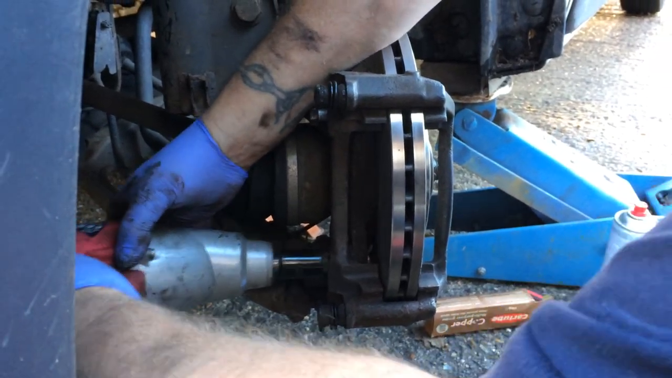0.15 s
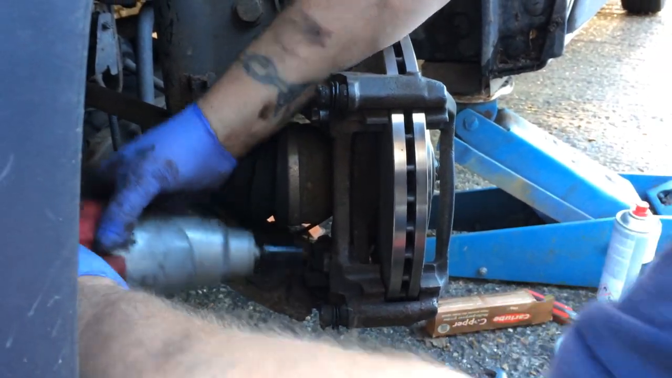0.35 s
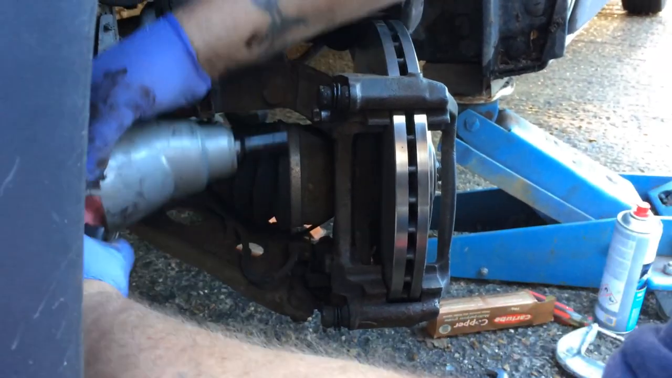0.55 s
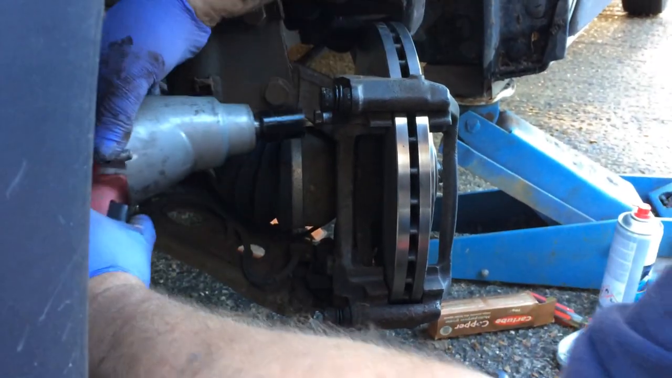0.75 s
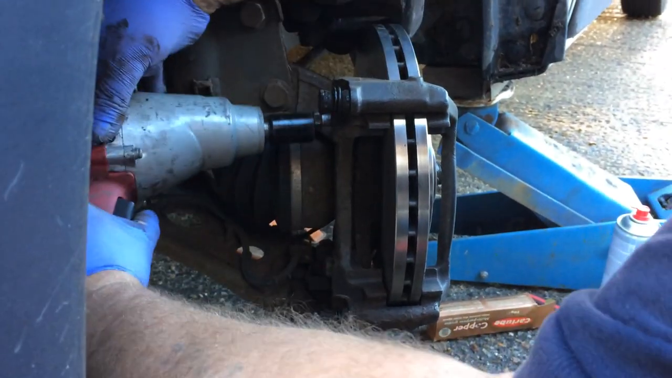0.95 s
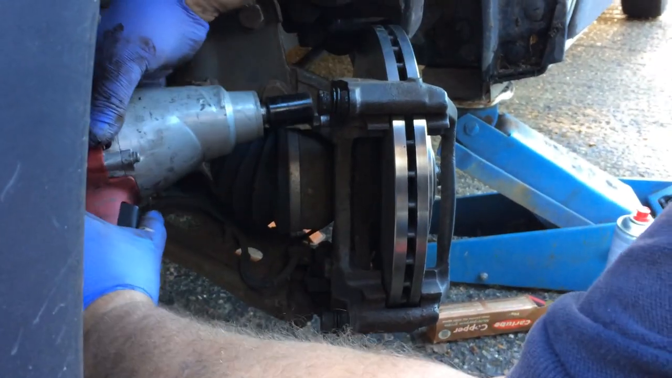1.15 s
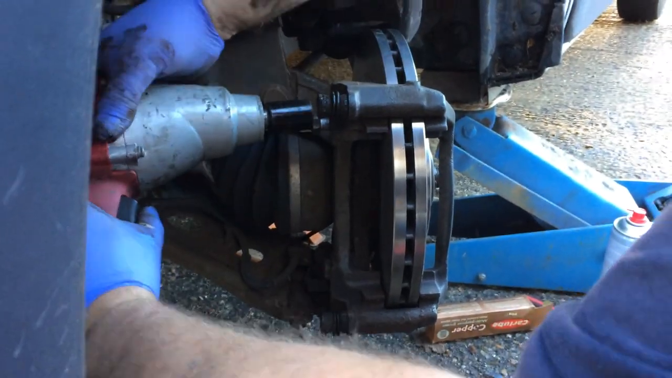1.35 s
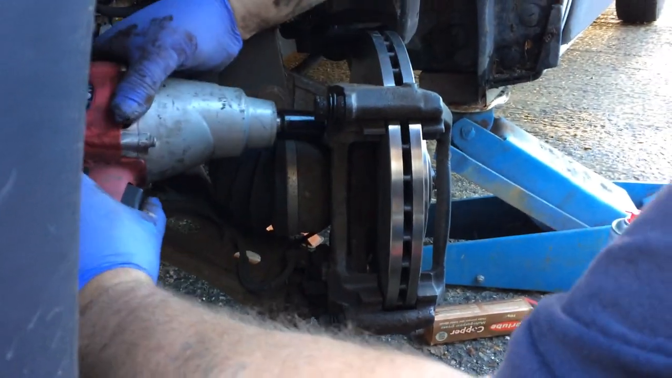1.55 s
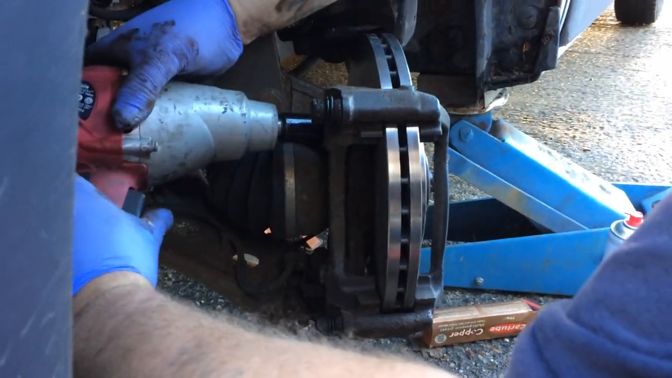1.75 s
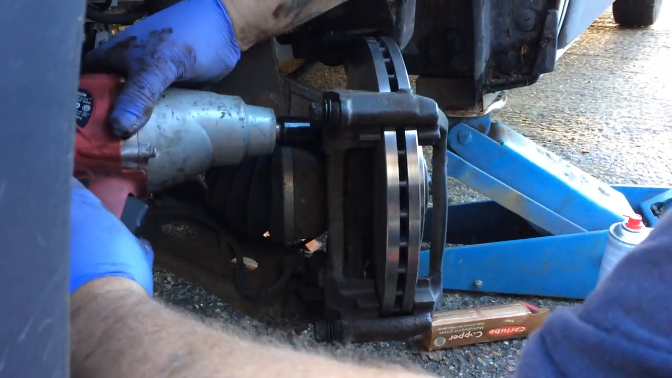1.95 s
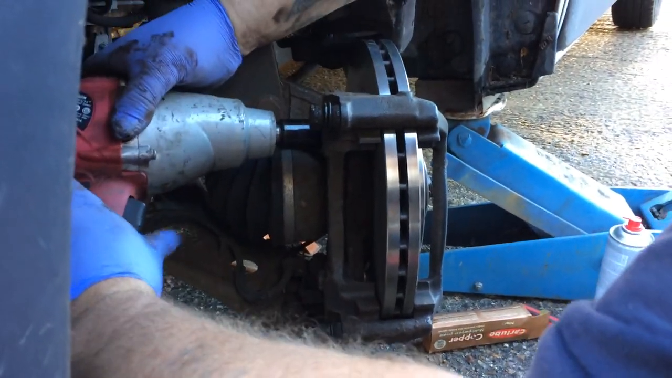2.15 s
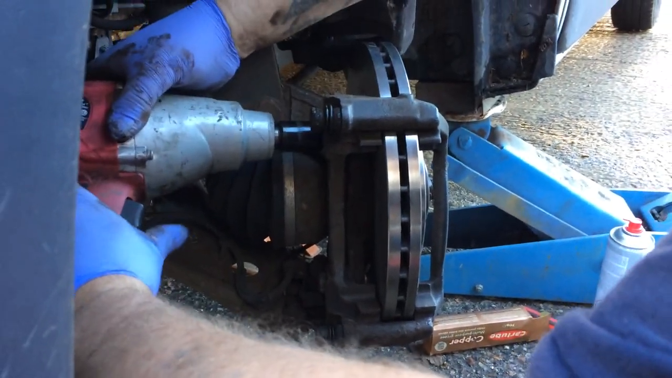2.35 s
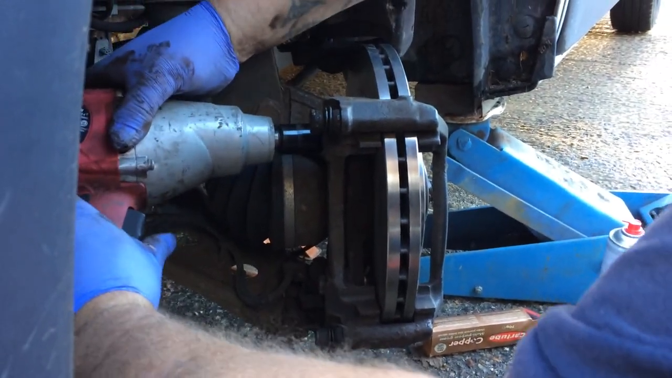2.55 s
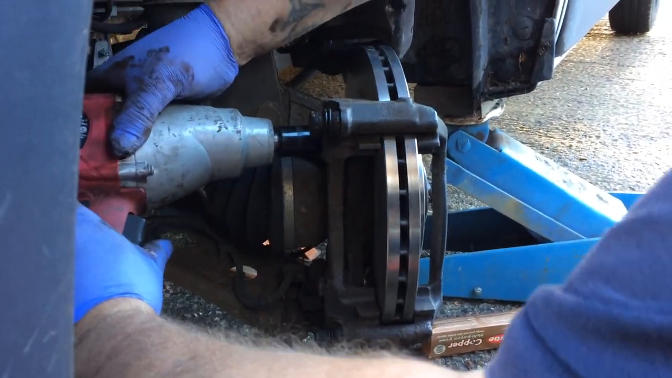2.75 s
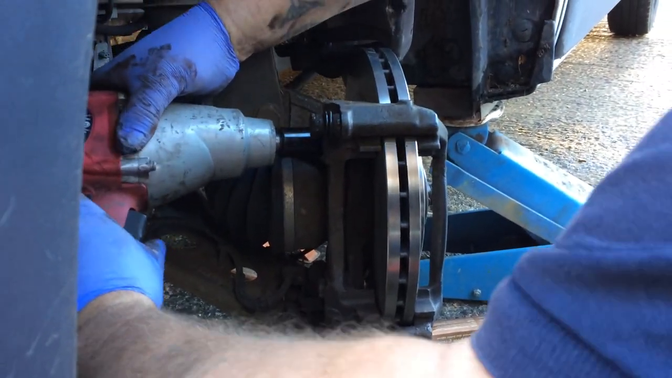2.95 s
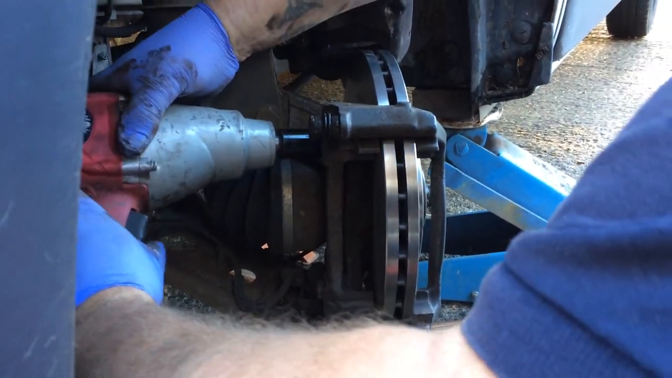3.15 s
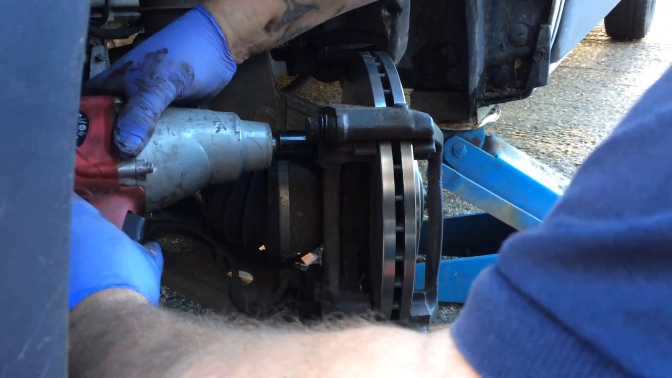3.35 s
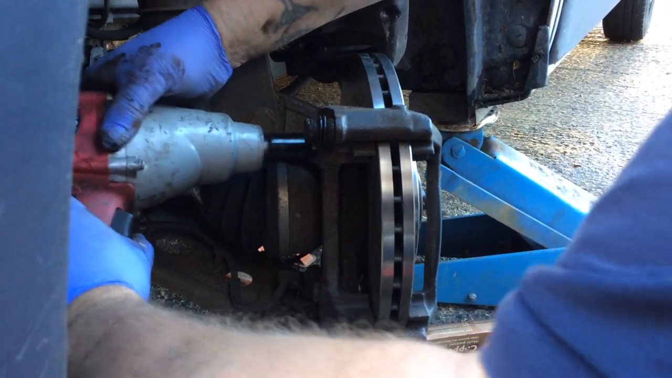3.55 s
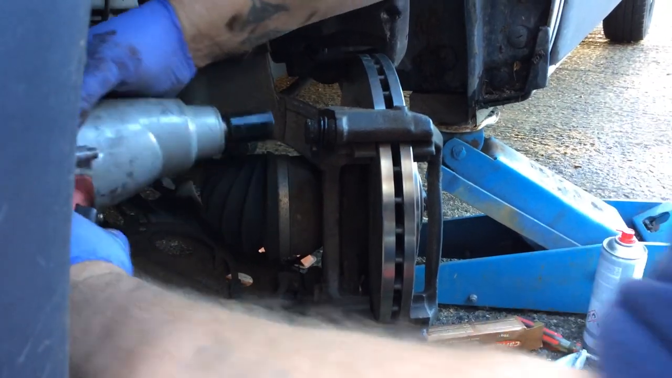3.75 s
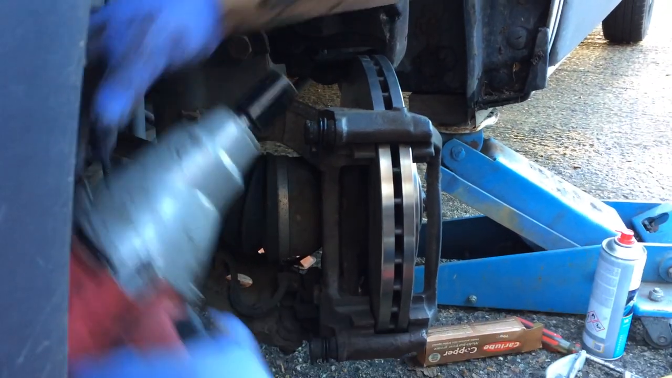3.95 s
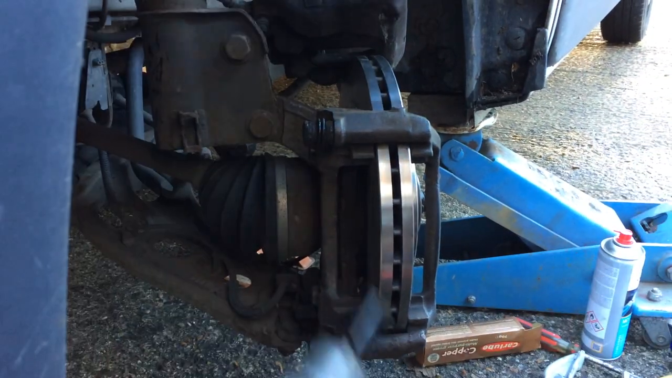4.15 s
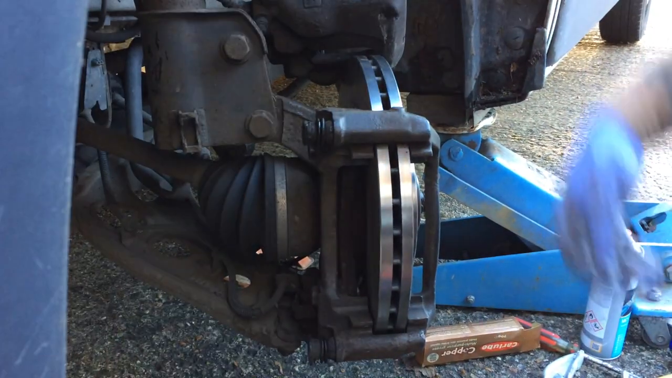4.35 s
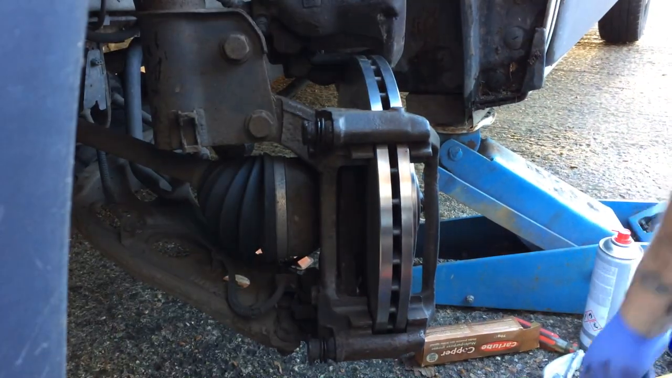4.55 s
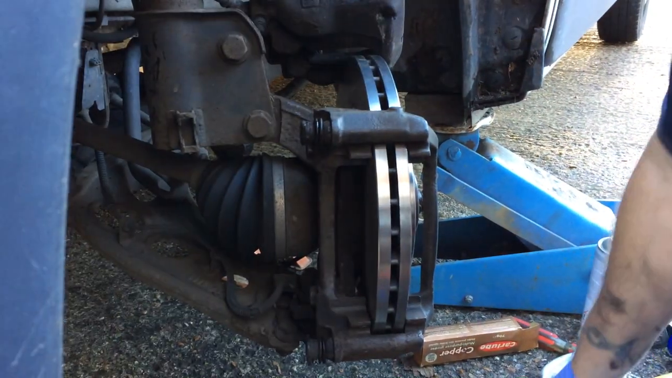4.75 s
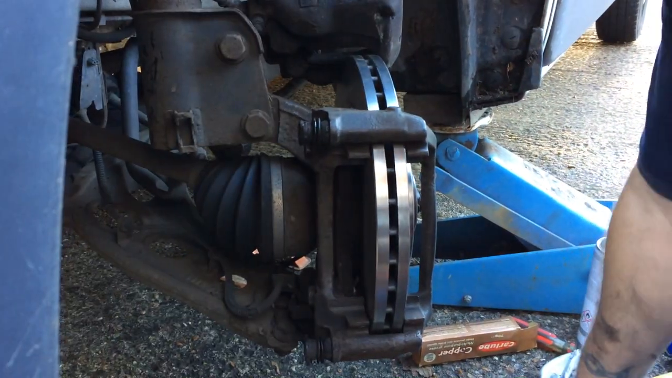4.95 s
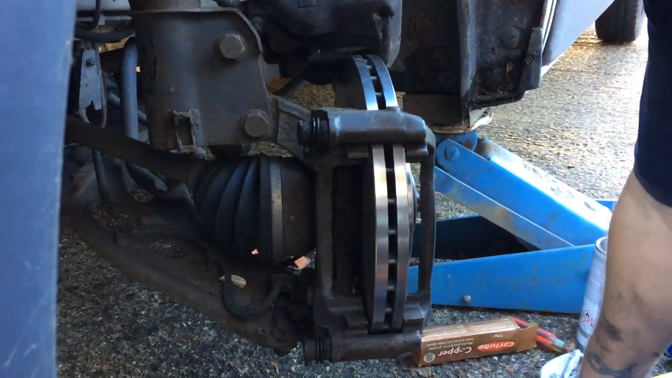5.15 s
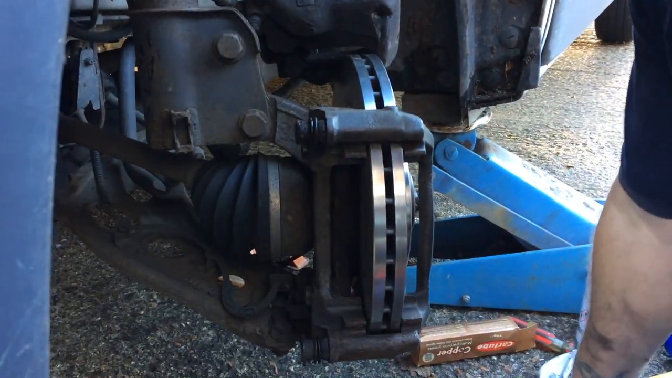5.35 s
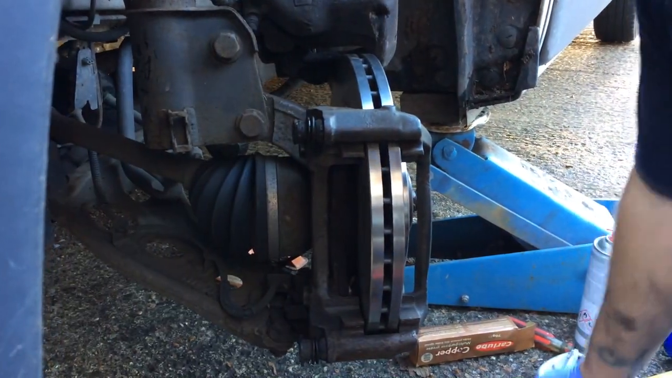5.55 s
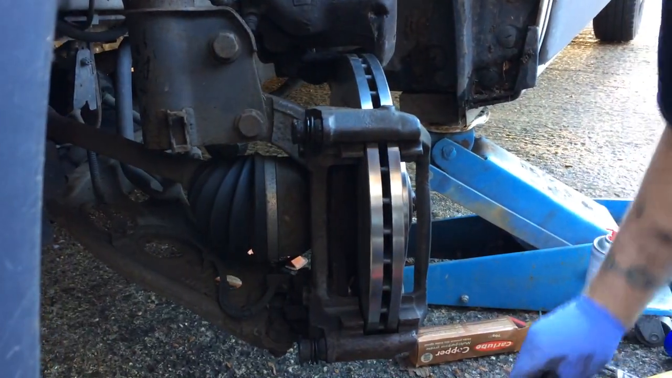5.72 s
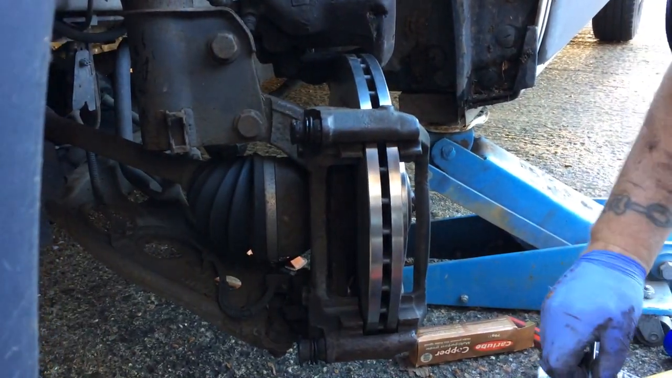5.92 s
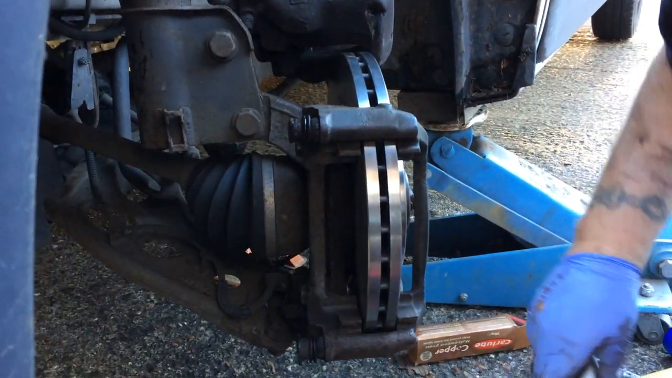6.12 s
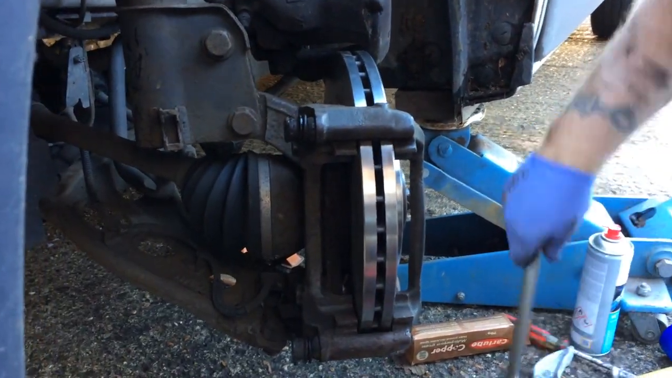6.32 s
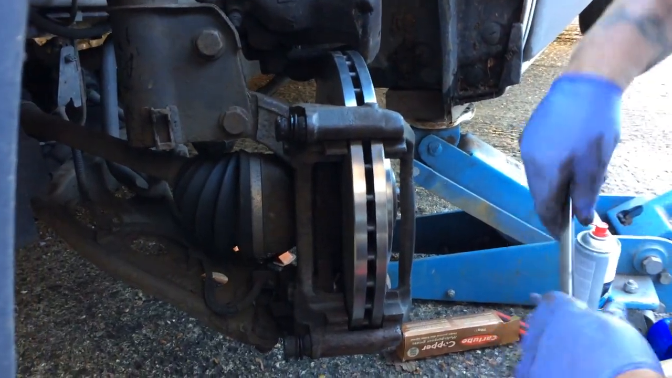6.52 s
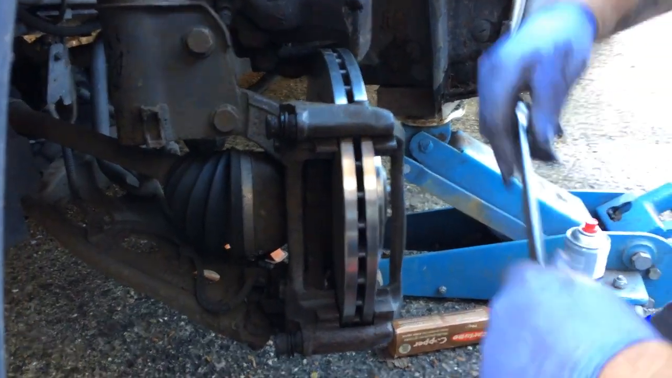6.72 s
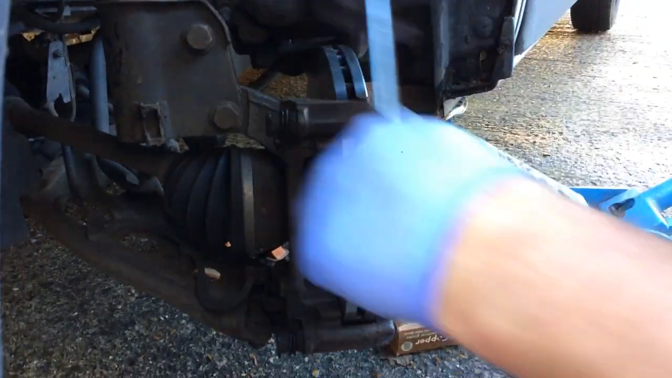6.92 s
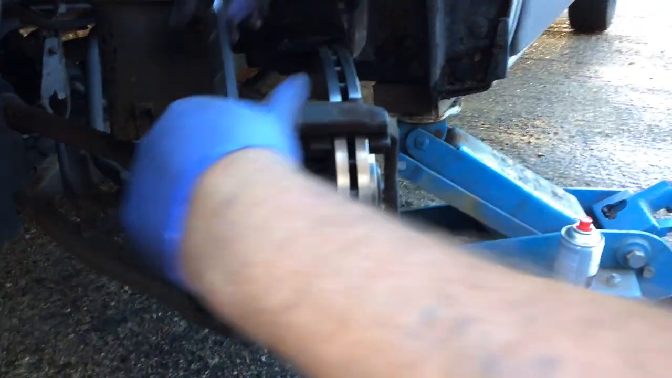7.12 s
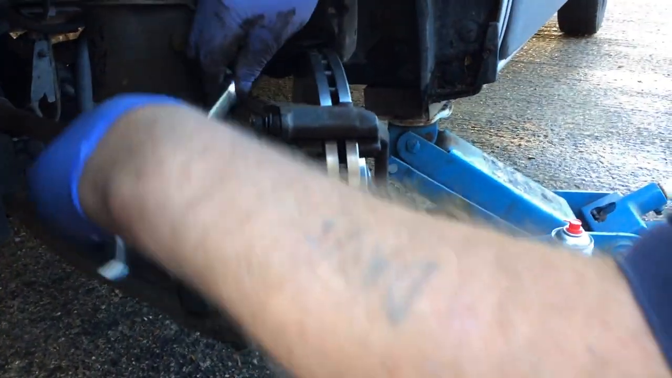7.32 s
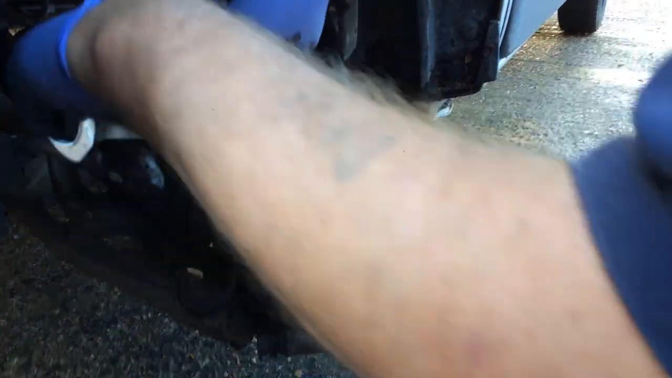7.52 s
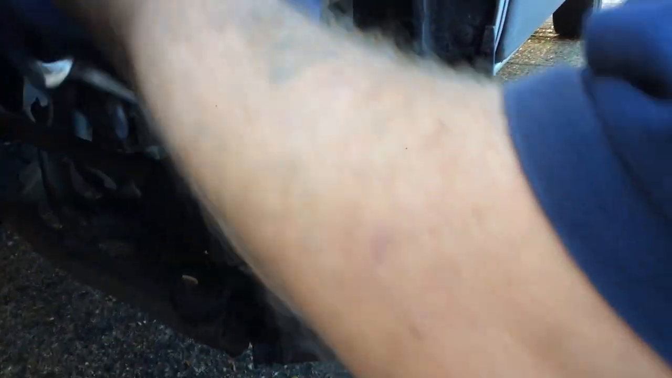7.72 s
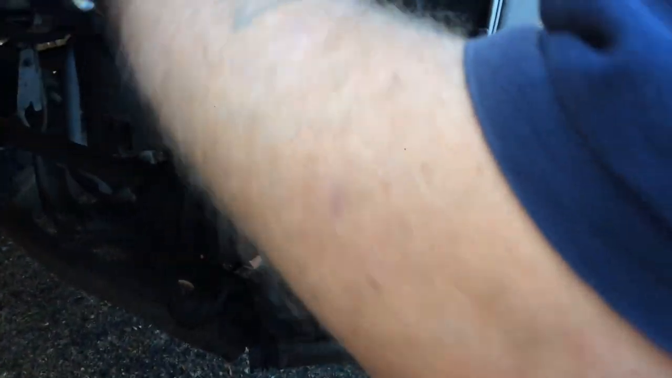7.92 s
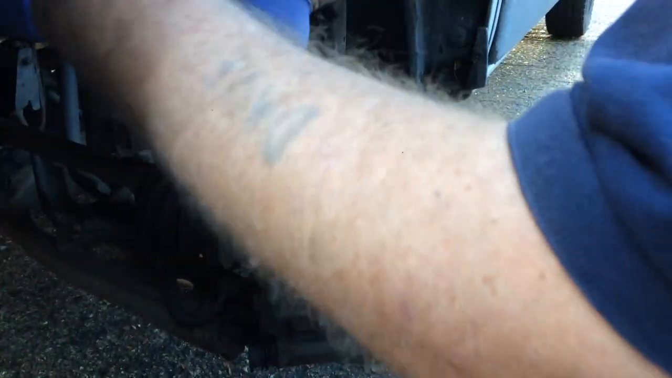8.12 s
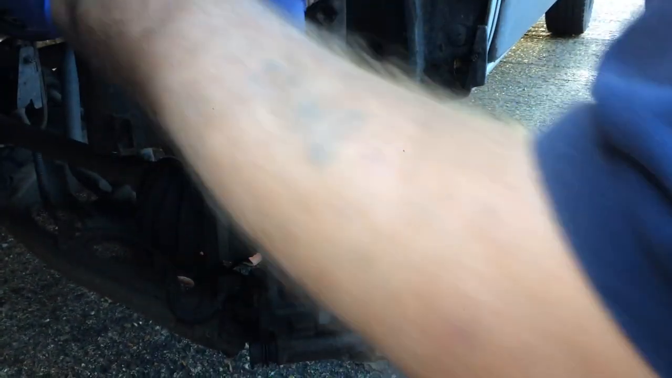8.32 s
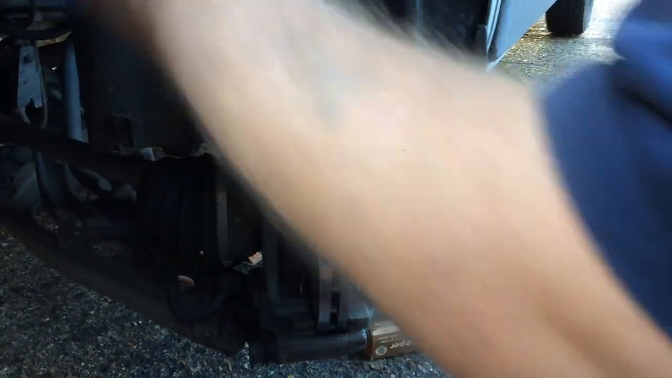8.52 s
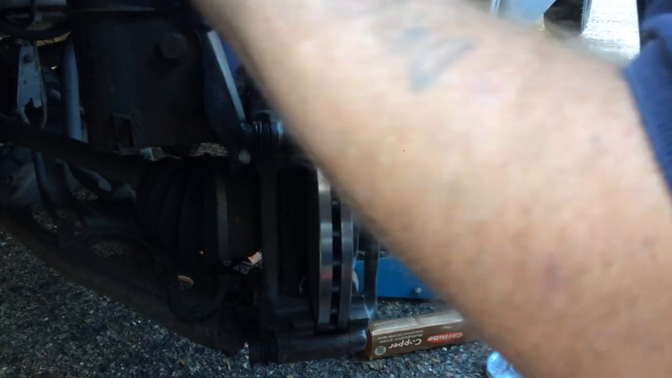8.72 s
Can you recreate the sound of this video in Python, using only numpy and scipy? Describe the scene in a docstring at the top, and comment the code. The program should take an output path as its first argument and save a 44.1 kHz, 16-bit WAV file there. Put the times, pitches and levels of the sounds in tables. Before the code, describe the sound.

A close, dry outdoor perspective beside a car's wheel arch, with a quiet street behind and faint tones dying away at the start. From 0.5 to 1.7 s a heavy wrench shifts with low rumbles, padded thuds and harder steel clacks. A sharp knock at 2.0 s begins the trigger pull: a whine races upward with loose rattling, bites at 2.4 s, and becomes loud, rough hammering at roughly forty blows a second until 3.15 s. A tiny blip at 3.2 s follows, then a soft rising whirr and light knocks. At 4.4 to 5.1 s the tool clunks down on concrete. Around 5.3 to 5.6 s a spanner scrapes and clinks brightly. Faint sleeve rustle follows near 6.2 and 6.8 s, then damped ticks and a scrape at 7.6 to 7.9 s and one knock at 8.6 s. Traffic swells from 4.7 s; a low engine hum peaks near 7.7 s.

```python
"""Faint fading tones and a quiet street open the scene; a heavy wrench shifts and knocks against a suspension.
The impact wrench spins a brake caliper bolt down with a whining rattle and hammers it tight: gliding partials,
dense random contacts and band-split noise crashes. It is laid down, and a steel spanner (beating modes) is
picked off the concrete and fitted to the bolt. Sleeves rustle as grainy noise; outside the open driveway
traffic noise swells and the hum of a distant engine joins in."""
import sys
import numpy as np
from scipy import signal
from scipy.fft import rfft, irfft, next_fast_len
from scipy.io import wavfile

SR = 44100
rng = np.random.default_rng(int(sys.argv[2]) if len(sys.argv) > 2 else 0)


def unload_wav(signal):
    """Save mono or channel-first audio to the path in sys.argv[1] as 16-bit WAV at rate SR, clipped to [-1, 1]."""
    wavfile.write(
        sys.argv[1],
        SR,
        np.round(np.clip(np.atleast_2d(signal).T, -1, 1) * 32767).astype(np.int16),
    )


N = 387198
TIME = np.arange(N) / SR
CUTOFF_HZ = 16000
LOADED_S, BITE_S, SEATED_S = 2.402, 0.03, 2.88   # the bolt takes load, within this time; its head seats
RELEASE_T60 = .13   # s, after the trigger is let go

# trigger pulls of the wrench: on_s, off_s, rattle level_db before load and trim
TRIGGER_PULLS = [(2.023, 3.141, -20.5), (3.193, 3.202, -16)]
# knocks of the tools against suspension and bolt: start_s, clack level_db before each layer's trim,
# hardness (about -1 padded, 1 bare steel)
TOOL_KNOCKS = [(0.543, -34.5, -1.06), (0.611, -23.5, -0.82), (0.654, -40.5, -1.19), (0.697, -38.5, -0.79),
               (0.913, -25.5, 0.4), (1.084, -25.5, 0.59), (1.428, -35.5, 0.16), (1.455, -33.5, 0.72),
               (1.488, -29, 0.41), (1.593, -42, -0.82), (1.666, -17.5, 0.45), (2.022, -31.5, 1),
               (2.045, -13.5, 0.78), (3.353, -27.5, 0.14), (3.532, -31.5, 0.69), (7.584, -35.5, -0.43),
               (7.821, -29.5, 0.62), (8.566, -26, 0.39)]
# colour of low rumble: pitch_hz, level_db
LOW_RUMBLE = [(25, -20), (60, 4.5), (120, 2), (260, -5), (400, -16), (900, -45)]


def from_db(db):
    """Decibels to amplitude."""
    return np.exp(np.asarray(db) * (np.log(10) / 20))


def rms_one(x):
    """Level a signal to rms one."""
    return x / np.sqrt(np.mean(x ** 2) + 1e-20)


def drift(rate):
    """Slow chance of rms one, with this many random points a second."""
    knots = rng.standard_normal(N // 32)
    return rms_one(np.interp(TIME * rate, np.arange(len(knots)), knots))


def noise(colour):
    """Steady noise of a given colour, rms one; it falls away below the first point."""
    hz, db = np.transpose(colour)
    size = next_fast_len(N)
    bins = np.maximum(np.arange(size // 2 + 1) * SR / size, 1)
    gain = from_db(np.interp(np.log(bins), np.log(hz), db)) * np.minimum(bins / hz[0], 1) ** 2
    return rms_one(irfft(rfft(rng.standard_normal(size)) * gain, size)[:N])


def filtered(x, edge_hz, kind, order=2):
    """Butterworth filter."""
    sos = signal.butter(order, np.minimum(edge_hz, SR / 2 - 100), kind, fs=SR, output="sos")
    return signal.sosfilt(sos, x)


def clicks(times, heights):
    """One sample per contact."""
    out = np.zeros(N)
    out[np.round(np.asarray(times) * SR).astype(int)] = heights
    return out + 1e-18


def dying(power, t60):
    """Amplitude envelope of energy that is put in and then leaks away."""
    return np.sqrt(signal.lfilter([1], [1, -from_db(-120 / (t60 * SR))], power))


def settled(t60):
    """Where the dying envelope settles when unit power keeps coming in."""
    return dying(np.ones(SR), t60)[-1]


def ring(x, hz, t60):
    """A unit click sets a sine of height one ringing."""
    r, w = from_db(-60 / (t60 * SR)), 2 * np.pi * hz / SR
    return signal.lfilter([0, np.sin(w)], [1, -2 * r * np.cos(w), r * r], x)


def crowded(x):
    """Heavy steel has countless close modes, which ripple the spectrum by a few dB every few tens of hertz."""
    size = next_fast_len(N)
    bins = np.arange(size // 2 + 1) * SR / size
    ripple_db = 1.7 * np.interp(bins / 45, np.arange(SR // 45), rng.standard_normal(SR // 45))
    # the ripple grows in towards 1500 Hz
    ripple = rms_one(from_db(ripple_db * np.clip(bins / 1500, 0, 1)))
    return irfft(rfft(x, size) * ripple, size)[:N]


def gate(on_s, off_s, attack_s, t60):
    """Attack, hold and release."""
    attack = np.clip((TIME - on_s) / attack_s, 0, 1)
    return attack * from_db(-60 * np.clip((TIME - off_s) / t60, 0, 2))


def strokes(rows):
    """Sliding contacts swell and fade smoothly about their middle; rows (middle_s, length_s, level_db)."""
    out = 0
    for s, length, db in rows:
        distance = np.minimum((2 * (TIME - s) / length) ** 2, 6)
        out = out + from_db(db) * np.exp(-np.square(distance))
    return out


def fading_tones():
    """A few faint tones die away at the start."""
    # start tones: pitch_hz, level_db, t60_s
    tones = [(286, -49.5, 4.5), (530, -58.5, 2.2)]
    out = 0
    for hz, db, t60 in tones:
        out = out + from_db(db - 60 * TIME / t60 + drift(15)) * np.sin(2 * np.pi * hz * TIME)
    return out


def outdoors(engine_hz=63.7, engine_waver=0.0091):
    """Far traffic noise that slowly swells, low rumble and the wavering sine hum of one engine."""
    # colour of the street: pitch_hz, level_db
    street_colour = [(150, 9), (480, -1), (1000, 2.5), (1500, 0), (2600, -12.5), (5000, -22),
                     (15000, -35.5)]
    # course of the distant engine's hum: time_s, level_db
    engine_course = [(6.1, -70), (6.19, -47.5), (7.46, -36.5), (7.7, -31.5), (8.38, -41), (8.78, -40)]
    street_db, rumble_db = -54, -53.5
    approach_s, approach_db_per_s = 4.72, 2   # traffic draws near
    engine_rumble_db = -7   # rumble that comes with the hum, relative to it

    s, db = np.transpose(engine_course)
    engine = from_db(np.interp(TIME, s, db)) * ((TIME > s[0]) & (TIME < s[-1]))
    hum = np.sin(2 * np.pi * np.cumsum(engine_hz * (1 + engine_waver * drift(9.2))) / SR)
    traffic_db = street_db + approach_db_per_s * np.maximum(TIME - approach_s, 0)
    traffic = from_db(traffic_db) * noise(street_colour)
    rumble_level = np.hypot(from_db(rumble_db), from_db(engine_rumble_db) * engine)
    rumble = rumble_level * from_db(2 * drift(7.4)) * noise(LOW_RUMBLE)
    return traffic + rumble + engine * from_db(drift(5.5)) * hum


def sliding(low_hz=1100, high_hz=4300):
    """Steel sliding on rough steel or concrete grates unevenly."""
    # tools sliding on bolt head and ground: middle_s, length_s, level_db
    slides = [(.08, 0.12, -51.5), (1.525, 0.039, -39), (3.58, 0.13, -52), (4.48, 0.28, -55),
              (5.597, 0.019, -35.5), (7.755, 0.033, -46), (7.848, 0.05, -35.5)]
    uneven = rng.standard_normal(N) * from_db(2 * drift(500))
    grit = rms_one(filtered(uneven, [low_hz, high_hz], "band"))
    return strokes(slides) * grit


def shifting(low_hz=80):
    """Moving the heavy wrench about makes the suspension rumble softly."""
    # the wrench shifting against the suspension: middle_s, length_s, level_db
    shifts = [(.42, 0.79, -48), (.85, 0.34, -44.5), (1.27, 0.26, -47.5), (1.64, 0.2, -45.5)]
    return strokes(shifts) * rms_one(filtered(noise(LOW_RUMBLE), low_hz, "high"))


def knocks(contact_t60=.0045, trim_db=-1):
    """A knock builds up over a few milliseconds and rings in noise registers; soft ones thud, hard ones tick."""
    # the wrench laid down on concrete: start_s, clack level_db before trim, hardness
    landings = [(4.384, -20, 0.56), (4.444, -29.5, 0.4), (4.737, -34, -0.43), (4.748, -27.5, 0.0044),
                (4.869, -30.5, 0.49), (5.076, -28, 0.85), (5.099, -20, -0.049)]
    # how each register dies: low_hz, high_hz, level_db, t60_s, gain_db per unit of hardness, concrete gain_db
    registers = [(785, 2030, -5.5, 0.072, -2.5, 2.5), (67.6, 313, -14, 0.18, -23, 1),
                 (339, 710, -23, 0.07, -21.5, 16), (2810, 6000, -11, 0.041, 6, -2),
                 (6610, 12000, -34, 0.034, 28.5, 2)]
    s, db, hardness = np.transpose([*TOOL_KNOCKS, *landings])
    on_concrete = np.arange(len(s)) >= len(TOOL_KNOCKS)
    out = 0
    for low_hz, high_hz, register_db, t60, hard_db, concrete_db in registers:
        force = from_db(db + register_db + hard_db * hardness + concrete_db * on_concrete)
        # the two parts stay in touch briefly and feed the ring meanwhile
        contact = dying(clicks(s, force ** 2), contact_t60) / settled(contact_t60)
        swell = dying(contact ** 2, t60)
        white = crowded(rng.standard_normal(N))
        band_level = np.std(filtered(white, [low_hz, high_hz], "band"))
        out = out + filtered(white * swell, [low_hz, high_hz], "band") / band_level
    return from_db(trim_db) * out


def thud(hard_db=-12):
    """Padded knocks push the heavy suspension, which answers in a few low modes."""
    # suspension modes: pitch_hz, level_db, t60_s
    low_modes = [(60, -15.5, .25), (150, -7.5, 0.12), (308, -12.5, 0.071)]
    s, db, hardness = np.transpose(TOOL_KNOCKS)
    push = clicks(s, from_db(db + hard_db * hardness))
    return sum(from_db(mode_db) * ring(push, hz, t60) for hz, mode_db, t60 in low_modes)


def socket(ring_db=-14, hard_db=8, t60=0.041):
    """Knocks ring the hollow socket, padded ones less, each with another mix of its modes."""
    # socket modes: pitch_hz, level_db before the ring level
    socket_modes = [(1380, -2.5), (1730, -1), (2230, -12), (2650, 2.5), (3460, -6.5), (4120, -2),
                    (4880, -2), (5950, -4.5)]
    s, db, hardness = np.transpose(TOOL_KNOCKS)
    force_db = db + ring_db + hard_db * np.minimum(hardness, 0)
    out = 0
    for hz, mode_db in socket_modes:
        mix_db = 3 * rng.standard_normal(len(s))
        out = out + ring(clicks(s, from_db(force_db + mode_db + mix_db)), hz, t60)
    return out


def disc(struck, knock_db=1):
    """The brake disc stores a little of each early knock and hammer blow and sings on faintly."""
    # long ring of the disc: pitch_hz, level_db, t60_s
    disc_modes = [(302, -50, 1.7), (430, -46.5, 1.6), (1106, -29.5, 0.19)]
    knocked = [(s, db + knock_db) for s, db, _ in TOOL_KNOCKS if s < TRIGGER_PULLS[0][0]]
    s, db = np.transpose([*knocked, *struck])
    energy = clicks(s, from_db(db) ** 2)
    out = 0
    for hz, mode_db, t60 in disc_modes:
        level = from_db(mode_db + 2 * drift(9.3))
        out = out + level * dying(energy, t60) * np.sin(2 * np.pi * hz * TIME)
    return out


def steel(x, shift_db=3):
    """Socket and caliper add their resonances to whatever shakes them; the level of each drifts."""
    # resonances: pitch_hz, width_hz, level_db above the broad colour
    resonances = [(1400, 78, -12.5), (2670, 21, -9), (2945, 58, -6), (3320, 32, -2), (6160, 23, -6)]
    out = x.copy()
    for hz, width_hz, db in resonances:
        r = np.exp(-np.pi * width_hz / SR)
        poles = [1, -2 * r * np.cos(2 * np.pi * hz / SR), r * r]
        resonance = (1 - r * r) / 2 * signal.lfilter([1, 0, -1], poles, x)
        out += from_db(db + shift_db * drift(22)) * resonance
    return out


def spinning_free():
    """One while the bolt turns easily, zero once it has taken load."""
    return np.clip((LOADED_S - TIME) / BITE_S + .5, 0, 1)


def effort(attack_s=.024, free_db=6, seated_db=-1.5):
    """The wrench shakes while the trigger is held: most spinning free, least once the bolt has seated."""
    held = sum(from_db(db) * gate(on, off, attack_s, RELEASE_T60) for on, off, db in TRIGGER_PULLS)
    return held * from_db(free_db * spinning_free() + seated_db * (TIME > SEATED_S))


def whine_hz():
    """Motor speed: a run-up towards the unloaded speed, then a sag that eases once the bolt has taken load."""
    start_hz, free_hz, spin_up_s = 450, 2010, .13
    # thread friction slows the motor: onset, then time constants free and loaded
    sag_from_s, sag_s, loaded_sag_s = 2.197, .92, 1.23
    pull_s = TRIGGER_PULLS[0][0]
    running_s = np.clip(TIME, pull_s, sag_from_s) - pull_s
    run_up = free_hz + (start_hz - free_hz) * np.exp(-running_s / spin_up_s)
    free_s = np.clip(TIME, sag_from_s, LOADED_S) - sag_from_s
    loaded_s = np.maximum(TIME - LOADED_S, 0)
    return run_up * np.exp(-free_s / sag_s - loaded_s / loaded_sag_s)


def casing(hz, centre_hz=6900, width_hz=1300):
    """How strongly the casing answers a gear tone of this pitch."""
    return np.exp(-((hz - centre_hz) / width_hz) ** 2)


def motor(flutter_db=3, drone_waver=0.016):
    """Whine partials race up, then sag as the bolt resists; the loose socket drones at first."""
    # partials of motor and gears: multiple of the whine, level_db before the whine level
    partials = [(1, -1), (1.35, -13), (2, -12.5), (2.43, -8), (3, -12.5), (4, -15), (5, -16)]
    free_whine_db, loaded_whine_db, swell_s = -19, -39, 0.0624   # swell before the gate is squared
    mesh_db = -28.5   # a high gear tone
    drone_top_hz, drone_db = 506, -26.5   # the freely spinning socket; pitch at top speed
    drone_from_s, drone_swell_s, drone_t60 = 2.07, 0.059, 0.26
    drone_follows = .3   # power of the motor speed that its pitch follows

    hz, free = whine_hz(), spinning_free()
    level_db = free_whine_db * free + loaded_whine_db * (1 - free)
    phase = 2 * np.pi * np.cumsum(hz * (1 + .0055 * drift(450))) / SR
    whine = 0
    for k, db in partials:
        level = from_db(db + flutter_db * drift(150)) * (1 + casing(k * hz))
        whine = whine + level * np.sin(k * phase)
    # the gear tone stands out only while it glides through the casing's resonance
    mesh = from_db(mesh_db + flutter_db * drift(60)) * casing(7 * hz) * np.sin(7 * phase)
    drone_hz = drone_top_hz * (hz / hz.max()) ** drone_follows * (1 + drone_waver * drift(14))
    drone = from_db(drone_db + drift(90)) * np.sin(2 * np.pi * np.cumsum(drone_hz) / SR)
    # squaring halves the release time
    turning = gate(TRIGGER_PULLS[0][0], SEATED_S, swell_s, RELEASE_T60) ** 2
    droning = gate(drone_from_s, LOADED_S - BITE_S, drone_swell_s, drone_t60)
    return (from_db(level_db) * whine + mesh) * turning + drone * droning


def rattle(contacts_per_s=800, contact_t60=0.087, spread_db=4, treble_hz=3500, trim_db=-0.5):
    """Loose steel chatters in hundreds of tiny contacts a second, faintly and dully as the gears run out."""
    # colour of the chatter: pitch_hz, level_db
    rattle_colour = [(180, -44.5), (300, -10.5), (749, -9), (1000, -3), (2050, 3), (2700, -5), (3580, -8),
                     (6200, -3), (10400, -13), (16000, -14.5)]
    # the gears run out after the last pull
    coast_s, coast_swell_s, coast_t60 = 3.3, .06, .55
    coast_db, coast_treble_db = -38, -9   # before trim

    contacts = (rng.random(N) < contacts_per_s / SR) * from_db(spread_db * rng.standard_normal(N))
    chatter = crowded(noise(rattle_colour)) * rms_one(dying(contacts ** 2 + 1e-18, contact_t60))
    body = filtered(chatter, treble_hz, "low", order=1)
    treble = chatter - body
    coast = from_db(coast_db) * gate(coast_s, coast_s + coast_swell_s, coast_swell_s, coast_t60)
    coasting = coast * (body + from_db(coast_treble_db) * treble)
    return from_db(trim_db) * (effort() * chatter + coasting)


def suspension(struck, shake_db=-20, free_db=-9, t60=0.19, jolt_db=-29, jolt_t60=0.18):
    """Rattle and blows shake the heavy parts behind the bolt, which ring on; a free bolt passes on less."""
    # colour of the shaken parts: pitch_hz, level_db
    shake_colour = [(50, -11), (110, 0), (175, 11), (270, -3.5), (800, -32.5)]
    s, db = np.transpose(struck)
    drive = effort() * from_db(shake_db + free_db * spinning_free())
    shaking = dying(drive ** 2 + 1e-18, t60) / settled(t60)
    jolts = dying(clicks(s, from_db(db + jolt_db) ** 2), jolt_t60)
    return noise(shake_colour) * np.hypot(jolts, shaking)


def blows(jitter_s=.0005, spread_db=.8):
    """Within a run the hammer strikes at a nearly even rate and strength: rows (start_s, level_db)."""
    # runs of hammer blows: first_s, end_s, blows per s, mean peak level_db before trims
    runs = [(2.414, 2.57, 40.5, -10.5), (2.591, 2.74, 43.5, -11), (2.758, 2.865, 40, -11.5),
            (2.892, 2.92, 48, -7.5), (2.931, 3.02, 37, -6.5), (3.022, 3.14, 45.5, -5.5),
            (3.162, 3.17, 45, -9.5), (3.199, 3.245, 56, -6)]
    even = []
    for first, end, per_s, db in runs:
        even += [(s, db) for s in np.arange(first, end, 1 / per_s)]
    even = np.array(even)
    return even + rng.standard_normal(even.shape) * [jitter_s, spread_db]


def hammer(struck, t60=0.05, treble_dies=0.072, trim_db=-4, rebound_db=-3, rebound_db_per_octave=-1.5):
    """Each blow on the anvil is a short noise crash, its bands weighted anew; a duller rebound follows soon."""
    # colour of a blow: pitch_hz, level_db
    blow_colour = [(180, -46.5), (300, -9), (511, -16.5), (1010, -0.5), (2150, -2.5), (4300, -8.5),
                   (5700, -8), (10600, -9.5), (16000, -18.5)]
    s, db = np.transpose(struck)
    rebound_s = s + rng.uniform(.006, .011, len(s))
    crashes = [crowded(noise(blow_colour)) for _ in range(2)]
    edges = np.geomspace(200, CUTOFF_HZ, 10)
    out = 0
    for k, (low, high) in enumerate(zip(edges, edges[1:])):
        force = from_db(db + trim_db + 2.5 * rng.standard_normal((2, len(s))))
        rebound = from_db(rebound_db + rebound_db_per_octave * max(np.log2(low / 1000), 0))
        energy = clicks(s, force[0] ** 2) + clicks(rebound_s, (rebound * force[1]) ** 2)
        band_t60 = t60 * (low / 1000) ** -treble_dies   # higher bands die sooner
        out = out + filtered(crashes[k % 2], [low, high], "band") * dying(energy, band_t60)
    return out


def whirr(roughness=.05):
    """The gears run out in a short, rough, rising whirr."""
    middle_s, length_s, level_db = 3.34, .075, -40
    middle_hz, octaves_per_s = 1350, 5
    hz = middle_hz * 2 ** (octaves_per_s * np.clip(TIME - middle_s, -length_s, length_s))
    phase = 2 * np.pi * np.cumsum(hz * (1 + roughness * drift(700))) / SR
    return strokes([(middle_s, length_s, level_db)]) * drift(250) * np.sin(phase)


def spanner(pivot_hz=5000, contact_t60=0.006, crack_db=-15, crack_t60=0.086, twin_db=-8, rub_db_per_octave=-19):
    """Touches and dragging set modes singing, each beating with a close twin; the grip damps them later."""
    # touches on concrete and bolt: start_s, level_db, brightness_db per e-fold of pitch above the pivot
    clinks = [(5.398, -37, -2), (5.439, -43.5, -6), (5.483, -24.5, 0), (5.497, -24.5, -9), (5.527, -21, 3),
              (5.554, -32.5, 6), (5.574, -15, 8.5), (7.587, -39.5, -13.5), (7.627, -49.5, -2),
              (7.845, -30.5, -10.5), (8.566, -34.5, -16.5)]
    # dragging over concrete and bolt head: middle_s, length_s, level_db, pitch_hz excited most
    scrapes = [(5.279, 0.09, -45.5, 3740), (5.373, 0.047, -38, 4230), (7.79, 0.094, -46, 6400),
               (7.854, 0.019, -21, 5650)]
    # spanner modes: mean pitch_hz, level_db, t60_s while loosely held
    modes = [(1130, -19, 0.23), (2320, -6.5, 0.09), (2870, -14, 0.11), (3890, 1, .11), (5840, -3, 0.074),
             (8150, -12, 0.17), (10310, -16.5, 0.16), (13000, -19, 0.085), (14260, -18, 0.094),
             (14510, -20, 0.11), (15200, -23, 0.2)]
    gripped_s, grip_share = 7, .38   # held against the bolt, it rings only this share as long
    s, db, bright_db = np.transpose(clinks)

    def touching(force):
        """Power that a touch feeds in while contact lasts."""
        return dying(clicks(s, force ** 2), contact_t60) ** 2 / settled(contact_t60) ** 2

    crack = filtered(crowded(rng.standard_normal(N)), 2000, "high")
    out = crack * dying(touching(from_db(db + crack_db)), crack_t60)
    drags = [(strokes([row[:3]]), row[3]) for row in scrapes]
    held = TIME >= gripped_s
    for hz, mode_db, t60 in modes:
        chance_db = 2.5 * rng.standard_normal(len(s))
        force = from_db(mode_db + db + bright_db * np.log(hz / pivot_hz) + chance_db)
        rub = 0
        for drag, best_hz in drags:
            rub = rub + drag * from_db(mode_db / 2 + rub_db_per_octave * abs(np.log2(hz / best_hz)))
        energy = touching(force) + (rub / settled(t60)) ** 2
        loose_swell = dying(energy * ~held + 1e-18, t60)
        held_swell = dying(energy * held + 1e-18, t60 * grip_share)
        phase = 2 * np.pi * np.cumsum(hz + 20 * drift(300)) / SR
        twin_hz = rng.choice([-1, 1]) * rng.uniform(40, 110)   # mean offset, which wanders widely
        twin_phase = phase + 2 * np.pi * np.cumsum(twin_hz * (1 + drift(130))) / SR
        out += np.hypot(loose_swell, held_swell) * (np.sin(phase) + from_db(twin_db) * np.sin(twin_phase))
    return out


def sleeves(grain_db=3):
    """Cloth and rubber brush past in soft, grainy strokes of noise."""
    # colour of the rustle: pitch_hz, level_db
    rustle_colour = [(1500, 1), (15000, 0.77)]
    # strokes of sleeve and glove: middle_s, length_s, level_db
    rustles = [(5.3, .12, -56), (6.22, .35, -58), (6.82, .45, -57)]
    return strokes(rustles) * noise(rustle_colour) * rms_one(from_db(grain_db * drift(140)))


def wheel_arch(x, wet_db=-17, t60=0.17, dull_hz=4500):
    """Short, dull reflections from bodywork and ground, as a decaying noise tail."""
    t = TIME[:SR // 2]
    dull = filtered(rng.standard_normal(len(t)), dull_hz, "low", order=1)
    tail = dull * from_db(-60 * t / t60) * (t > .004)
    return x + from_db(wet_db) * signal.fftconvolve(x, tail / np.linalg.norm(tail))[:N]


def scene():
    """Steel colours the wrench and knocks, the wheel arch reflects all metal, the surroundings stay dry."""
    struck = blows()
    shaken = steel(sliding() + knocks() + motor() + rattle() + hammer(struck))
    metal = shaken + socket() + disc(struck) + whirr() + spanner()
    near = wheel_arch(metal + shifting() + thud() + suspension(struck))
    return (fading_tones() + outdoors() + near + sleeves())[None]


def record(dry, top=0.65):
    """The loudest peaks are rounded, the top is cut."""
    rounded = top * np.tanh(dry / top)
    return signal.sosfilt(signal.ellip(10, .1, 80, CUTOFF_HZ, fs=SR, output="sos"), rounded)


dry = scene()
out = record(dry)
unload_wav(out)
```